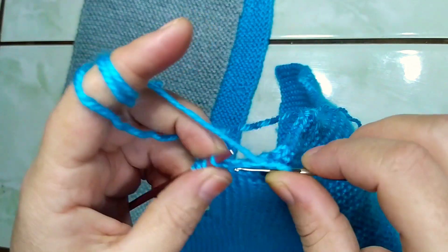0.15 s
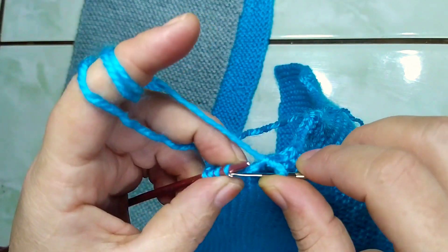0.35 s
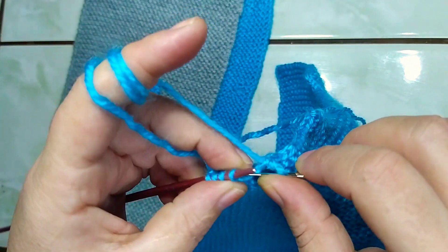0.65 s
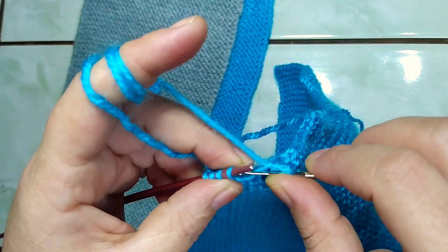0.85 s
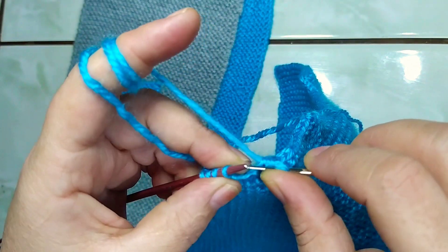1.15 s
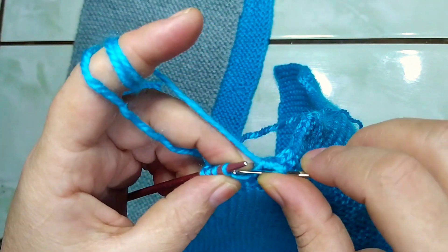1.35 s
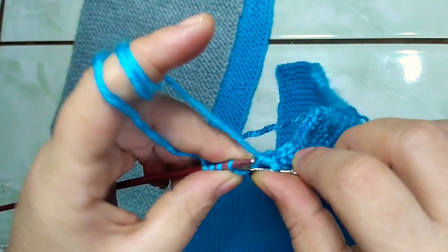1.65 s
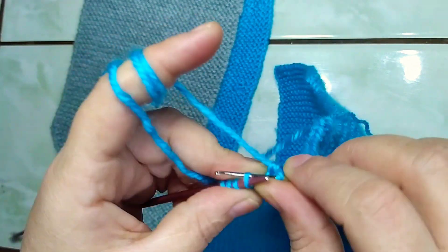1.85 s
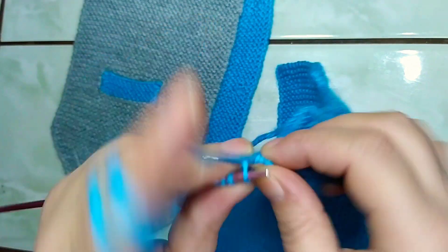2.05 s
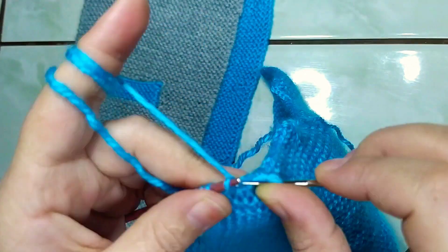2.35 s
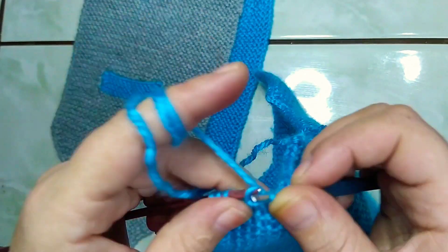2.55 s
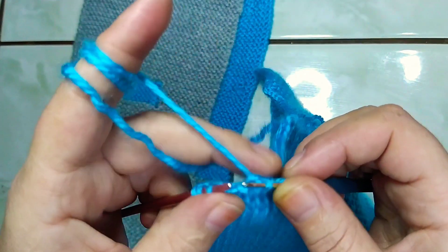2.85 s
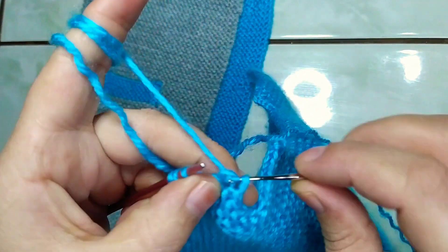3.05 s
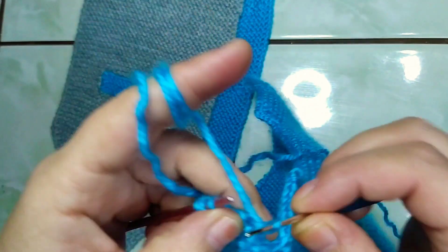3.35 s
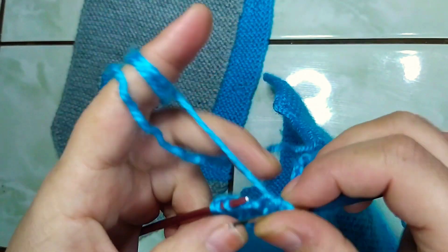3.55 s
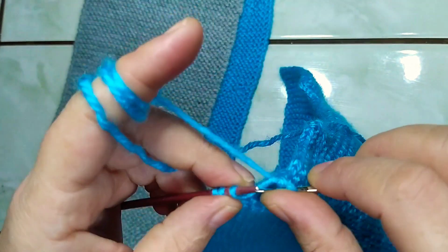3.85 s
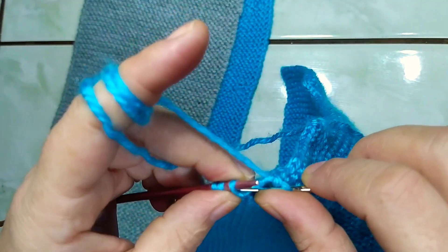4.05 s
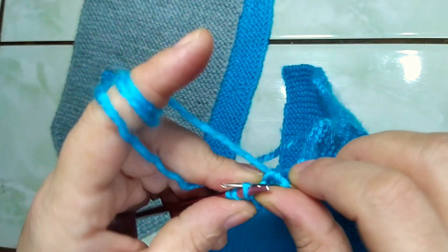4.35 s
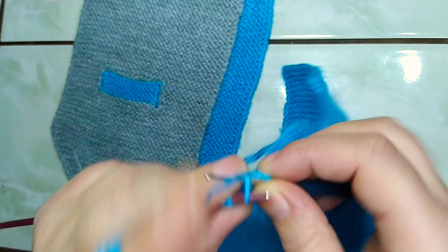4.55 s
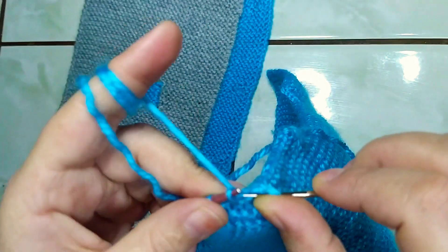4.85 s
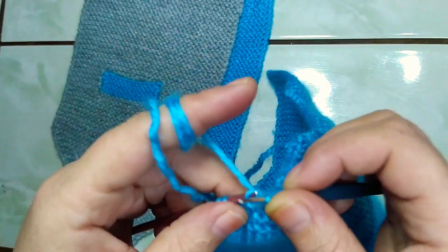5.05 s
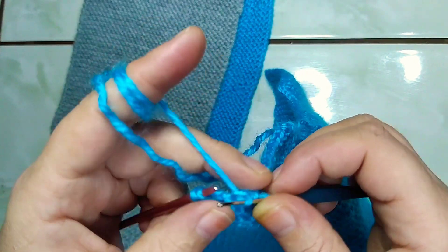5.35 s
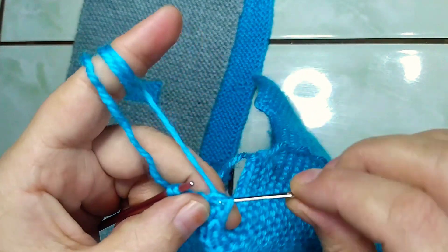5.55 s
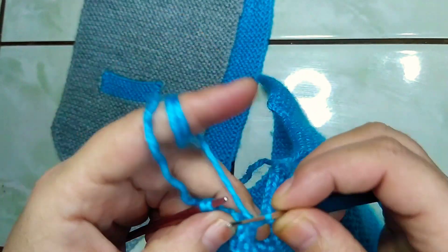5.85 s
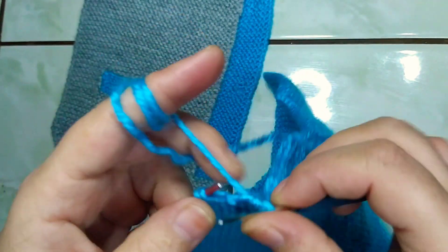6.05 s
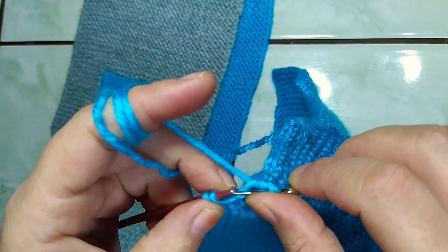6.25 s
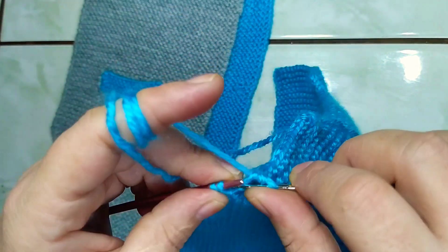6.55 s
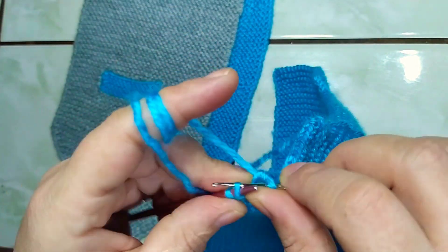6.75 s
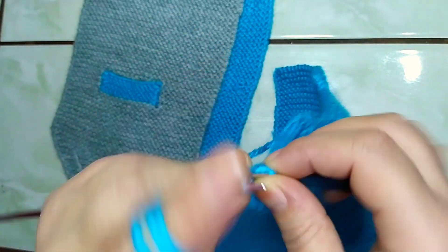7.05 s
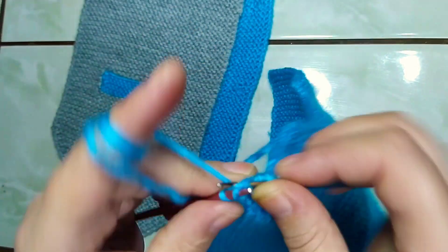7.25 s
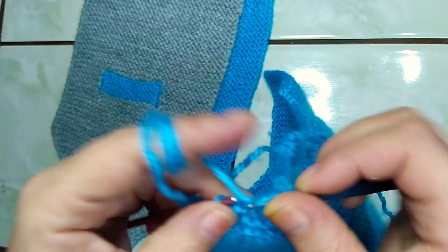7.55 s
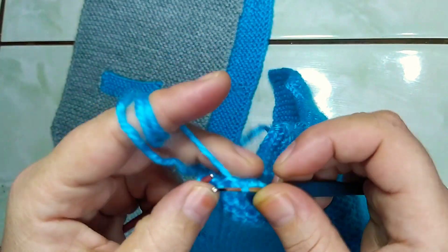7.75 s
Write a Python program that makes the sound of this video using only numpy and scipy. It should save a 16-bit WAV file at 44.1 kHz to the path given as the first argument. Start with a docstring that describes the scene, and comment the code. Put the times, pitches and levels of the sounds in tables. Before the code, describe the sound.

Close, quiet needlework: wispy wool hiss, tiny irregular metallic ticks, a single loud sharp crack near two seconds, then smaller snaps ringing off tiles.

```python
"""Two metal needles work yarn in a small tiled room, over a faint steady hum of air made of shaped noise.
It opens on the tail of a snap, while wool rustles on the shafts as many tiny grains in a soft hiss.
From then on the needle tips tick: short noise scrapes rung through the resonances of the needles.
The hardest snap comes at 1.75 s with one low push of air; lesser ones follow to 7.35 s.
A snap is a skid, a crack and the ringing room: the harder, the brighter and leaner."""
import sys
import numpy as np
from scipy import signal
from scipy.fft import rfft, irfft
from scipy.io import wavfile
from scipy.ndimage import uniform_filter1d

SR = 44100
rng = np.random.default_rng(int(sys.argv[2]) if len(sys.argv) > 2 else 0)


def to_wav(s):
    """Save 16-bit WAV."""
    ch = np.atleast_2d(s).T  # columns
    pcm = np.round(np.clip(ch, -1, 1) * 32767)  # PCM
    wavfile.write(sys.argv[1], SR, pcm.astype(np.int16))


N = 348390


def amp(db):
    """Decibels to gain."""
    return 10 ** (np.asarray(db) / 20)


def evened(x):
    """Scales to rms 1."""
    return x / np.sqrt(np.mean(x ** 2) + 1e-20)


def read(points, hz):
    """Reads a table on a log-frequency axis."""
    f, value = np.transpose(points)
    return np.interp(np.log(hz + 1), np.log(f + 1), value)


def lifts(modes, hz):
    """The dB that a set of resonances adds at each frequency."""
    return sum(db / (1 + (2 * (hz - f) / width) ** 2) for f, width, db in modes)


def bins(size):
    """Frequencies of the spectrum of so many samples."""
    return np.fft.rfftfreq(size, 1 / SR)


def ringing(db):
    """Causal (minimum-phase) impulse response of energy 1 with the given dB spectrum."""
    both_halves_db = np.concatenate([db, db[-2:0:-1]])
    log_gain = np.log(amp(both_halves_db))
    spectrum = np.exp(np.conj(signal.hilbert(log_gain)))
    response = np.fft.ifft(spectrum).real[:len(db)]
    return response[None] / np.linalg.norm(response)


def add(mix, s, sound):
    """Mixes a stereo sound in at time s, cutting what falls outside the mix."""
    start = round(s * SR)
    sound = sound[:, max(-start, 0):]
    part = mix[:, max(start, 0):][:, :sound.shape[1]]
    part += sound[:, :part.shape[1]]


def paired(x, likeness):
    """Gives two unrelated channels the listed left-right correlation at each frequency."""
    left, other = rfft(x)
    same = np.clip(read(likeness, bins(x.shape[1])), -1, 1)
    right = same * left + np.sqrt(1 - same ** 2) * other
    return irfft(np.array([left, right]), x.shape[1])


# spectrum of the room air, before it is set to its level: (f/Hz, relative level/dB)
AIR_COLOUR = [(5, 3), (14, -1.5), (22, -6), (36, -11), (100, -20.5), (200, -20), (400, -25), (680, -27.5),
              (1040, -33), (3000, -40), (6000, -45), (10600, -43.5), (13000, -51), (16000, -54.5)]
# its humming resonances: (f/Hz, width/Hz, lift/dB)
AIR_HUMS = [(195, 26, 4.3), (661, 35, 8.6), (740, 50, 5.1)]
# its stereo width: (f/Hz, left-right correlation)
AIR_WIDTH = [(60, 0.14), (150, -0.041), (380, 0.17), (950, -0.12), (2380, 0.21), (5980, -0.054),
             (15000, 0.21)]


def air(level_db=-64.5, balance_db=-0.2):
    """Steady room noise with a deep rumble and a few low humming resonances; level is rms above 20 Hz."""
    hz = bins(N)
    colour = read(AIR_COLOUR, hz) + lifts(AIR_HUMS, hz)
    noise = rfft(paired(rng.standard_normal((2, N)), AIR_WIDTH)) * amp(colour)
    audible_rms = np.std(irfft(noise * (hz > 20), N))
    sides = amp([[balance_db / 2], [-balance_db / 2]])
    return amp(level_db) * irfft(noise, N) / audible_rms * sides


# how long each band takes to die by 60 dB in the room: (f/Hz, decay t/s)
ROOM_DECAY = [(150, 0.53), (700, 0.31), (2000, .33), (5000, 0.28), (10000, 0.24), (15000, 0.28)]
# stereo width of the reflections: (f/Hz, left-right correlation)
ROOM_WIDTH = [(100, .9), (600, 0.86), (1300, 0.068), (3000, 0.046), (15000, 0.046)]


def room(build_s, first_gap_s=.0003, size=22050):
    """Reflections off tiles and walls grow denser; each band dies at its own speed; energy 1 a channel."""
    t = np.arange(size) / SR
    density = np.minimum((1 + t / 0.023) / (first_gap_s * SR), 1)  # chance of a reflection per sample
    present = rng.random((2, size)) < density
    taps = rng.choice([-1., 1.], (2, size)) * present / np.sqrt(density)
    hz, frame_s, z = signal.stft(paired(taps, ROOM_WIDTH), SR, nperseg=256)
    decay = amp(-60 * frame_s / read(ROOM_DECAY, hz)[:, None])
    tail = signal.istft(z * decay, SR, nperseg=256)[1][:, :size]
    tail *= 1 - np.exp(-(t / build_s) ** 2)  # soft onset
    return evened(tail) / np.sqrt(size)


def contact(length_ms, size=22050):
    """A brief scrape: a cluster of tiny slips that swells and dies; energy 1 a channel."""
    u = np.arange(size) / SR * 1000 / max(length_ms, .2)  # time in scrape lengths
    swell = np.sqrt(u) * np.exp(-np.minimum(u, 50))
    slips = rng.standard_normal((2, size)) * swell
    return slips / np.linalg.norm(slips, axis=1, keepdims=True)


def wander(count):
    """Slow random drift of rms 1, noise smoothed twice over so many samples."""
    once = uniform_filter1d(rng.standard_normal(N), count, mode="wrap")
    return evened(uniform_filter1d(once, count, mode="wrap"))


# how hard the wool slides on the shafts: (t/s, level/dB before the rustle's gain)
WOOL_SLIDING = [(0.0, -72), (0.18, -78), (0.3, -89), (0.46, -77.5), (1.32, -93), (1.58, -84), (1.64, -71),
                (2.04, -63.8), (2.18, -76.5), (2.57, -74), (3.13, -80), (3.23, -70.5), (3.81, -78.5),
                (3.91, -84.5), (4.47, -71), (5.51, -76.5), (5.73, -69.5), (6.43, -86), (6.59, -79.5),
                (7.34, -70), (7.88, -78.5)]


def sliding_db(s):
    """Level of the sliding wool at time s, drawn as straight dB ramps."""
    return np.interp(s, *np.transpose(WOOL_SLIDING))


# spectrum of the wool: (f/Hz, relative level/dB per Hz)
WOOL_COLOUR = [(800, -17), (3000, -9), (7000, -11), (9500, -1.5), (11000, 1.5), (12200, -10), (16000, -15)]


def rustle(gain_db=3.0, catches_per_s=700, spread_db=6.5, smooth=0.45, room_db=-2, grip_db=2.5):
    """Wool fibres catch and let go on the shafts: uneven tiny grains in a soft hiss, under a varying grip."""
    caught = rng.random(N) < catches_per_s / SR
    catches = caught * amp(spread_db * np.minimum(rng.exponential(1, N), 4))
    grains = signal.fftconvolve(catches[None], contact(0.48), axes=1)[:, :N]
    fibres = grains + smooth * rng.standard_normal((2, N))
    fibres *= amp(grip_db * wander(count=600))
    fibres += amp(room_db) * signal.fftconvolve(fibres, room(build_s=.007), axes=1)[:, :N]
    colour = read(WOOL_COLOUR, bins(4096))
    wool = signal.fftconvolve(fibres, ringing(colour), axes=1)[:, :N]
    return evened(wool) * amp(gain_db + sliding_db(np.arange(N) / SR))


def slide(length_ms, size=530):
    """The tip skids harder and harder, then lets go: a scrape played backwards; energy 1 a channel."""
    return contact(length_ms, size=size)[:, ::-1]


def ripple(hz):
    """Random uneven colouring: neighbouring frequencies are lifted or cut by chance; rms 1 on a 55 Hz grid."""
    grid = np.arange(0, 24000, 55)
    return np.interp(hz, grid, rng.standard_normal(len(grid)))


# a harder snap than usual is brighter and has less thump, by so many dB per dB of force
USUAL_SNAP_DB = -45  # on the level scale of the snap table
SNAP_TREBLE_DB, TREBLE_DB_PER_DB = -12.5, 0.99
SNAP_THUMP_DB, THUMP_DB_PER_DB = 6, -0.8
TIP_HZ, TIP_WIDTH_HZ = 9860, 610  # ring of the steel tip
# sharp snaps: (t/s, level/dB before the snaps' gain, lift of the tip ring/dB)
SNAP_EVENTS = [(-0.022, -36.5, 12), (1.7526, -23, -4), (3.256, -58, 9), (3.4396, -41, 11),
               (5.2647, -46, 10.5), (5.646, -55, 6), (5.832, -47.5, 11), (5.907, -59, 4.5),
               (5.962, -57.5, 6), (5.993, -61, 6), (7.35, -45, 4)]
# spectrum of a snap: (f/Hz, relative level/dB per Hz)
SNAP_SPECTRUM = [(40, -21.5), (110, -19.5), (180, -10), (330, -10.5), (560, -3), (800, -1), (1200, 1),
                 (2500, 0.5), (4000, -1.5), (7000, -4.5), (10500, -5.5), (12000, -13), (14000, -27.5),
                 (16000, -32)]
# resonances of a snap: (f/Hz, width/Hz, lift/dB)
SNAP_RESONANCES = [(166, 75, 7), (291, 60, 11), (402, 47, 5.2), (718, 23, 3.7), (1008, 180, 4),
                   (1215, 70, 3), (1910, 120, 4), (2212, 10, 4.8), (2660, 280, 6.9), (2954, 25, 6),
                   (3372, 19.3, 4.5), (4430, 35, 3.7), (5330, 50, 5.7), (6630, 45, 7), (10460, 320, 3)]


def snaps(gain_db=34, crack_ms=0.58, crack_db=-9, skid_db=-23, skid_ms=0.74, treble_hz=3900,
          thump_hz=120, own_share=.45, ripple_db=4.0, ripple_from_hz=1000):
    """A skid, a short crack, then the room; snaps come from nearly one spot and share many reflections."""
    out, hz, shared = np.zeros((2, N)), bins(8192), room(build_s=0.002)
    own = np.clip(own_share, 0, 1)
    body = read(SNAP_SPECTRUM, hz) + lifts(SNAP_RESONANCES, hz)
    body += ripple_db * ripple(hz) * hz / (hz + ripple_from_hz)
    for s, db, tip_db in SNAP_EVENTS:
        force_db = db - USUAL_SNAP_DB
        treble_db = SNAP_TREBLE_DB + TREBLE_DB_PER_DB * force_db
        thump_db = SNAP_THUMP_DB + THUMP_DB_PER_DB * force_db
        colour = body + lifts([(TIP_HZ, TIP_WIDTH_HZ, tip_db)], hz)
        colour += treble_db * hz ** 4 / (hz ** 4 + treble_hz ** 4)
        colour += thump_db / (1 + (hz / thump_hz) ** 2)
        tail = np.sqrt(1 - own) * shared + np.sqrt(own) * room(build_s=0.0051)
        skid = amp(skid_db) * slide(skid_ms)
        crack = amp(crack_db) * contact(crack_ms)
        blow = np.hstack([skid, crack + tail])
        snap = amp(db + gain_db) * signal.fftconvolve(blow, ringing(colour), axes=1)
        add(out, s - skid.shape[1] / SR, snap)  # the crack, not the skid, falls on s
    return out


def grazes(count=40, over_wool_db=19.0, spread_db=3.5, pan_db=-3.0, pan_spread_db=4):
    """Faint chance touches of the tips, the stronger the more the wool moves; rows like TICK_EVENTS."""
    s = rng.uniform(0, N / SR, count)
    strength, side = rng.standard_normal((count, 2)).T
    db = sliding_db(s) + over_wool_db + spread_db * strength
    return np.column_stack([s, db, pan_db + pan_spread_db * side, np.full(count, USUAL_LOW_DB)])


CONTACT_MS, CONTACT_SCATTER = 1.1, .12  # scrape length of the tips, and its random spread (log scale)
LOW_RING_HZ, USUAL_LOW_DB = 6960, -20  # the low ring lies below this pitch; this strength leaves it as is
# clear ticks of the needle tips: (t/s, level/dB before the ticks' gain, left over right/dB,
# low ring/dB, heard as its difference from the usual)
TICK_EVENTS = [(0.191, -52.5, -1.0, -20), (0.385, -52, -2.0, -20), (0.448, -45.5, 0, -16),
               (0.5681, -49, -3, -21), (0.6943, -58, 2.5, -18), (0.9722, -57, 0.0, -20),
               (1.2335, -45.5, 1.0, -26), (1.6266, -44.5, 0, -29), (1.6761, -50, -6, -20),
               (1.7515, -4.5, -0.5, -13.5), (1.988, -41.5, -12, -16), (2.0972, -41.5, -5.5, -20),
               (2.2398, -43.5, -4.5, -22.5), (2.2466, -43.5, -2.5, -22.5), (2.331, -42, -6, -29.5),
               (3.256, -46, -6, -17), (3.4384, -21.5, -4.5, -23.5), (3.4417, -17, -2.5, -23),
               (3.6265, -47, 2, -23.5), (3.7588, -51, -1, -16), (4.1118, -45, -2.5, -16.5),
               (4.2118, -46, 0.5, -15.5), (4.2378, -38, -3.5, -17), (4.2467, -38.5, 2.0, -18.5),
               (4.3158, -36, 2, -14), (4.4942, -45, -3.5, -18.5), (4.589, -47.5, -5.5, -12.5),
               (4.7747, -46.5, -3.5, -23.5), (5.0913, -52, -0.5, -24), (5.2653, -27.5, -3, -16),
               (5.5927, -52, 2, -20), (5.7828, -46, -9, -26), (5.8364, -29.5, -5.0, -19),
               (5.9057, -36, -6, -20), (6.0182, -43, -10, -24), (6.1764, -49.5, -0.5, -23.5),
               (6.6608, -32.5, -2, -17.5), (6.6734, -36.5, -0.5, -17.5), (6.6768, -32, -3, -20),
               (6.705, -32, -2.5, -22.5), (6.7691, -40, -5, -16), (6.821, -48, -7, -16),
               (7.0017, -48.5, -9.5, -15), (7.0836, -44, -3.5, -19.5), (7.113, -49, -3.5, -13.5),
               (7.2978, -44, -6, -23.5), (7.3529, -28.5, -6.5, -19), (7.4684, -39, -7, -22)]
# spectrum of a tick: (f/Hz, relative level/dB per Hz)
TICK_SPECTRUM = [(300, -32), (1500, -25), (3000, -17), (5000, -15.5), (7200, -10.5), (9000, -7),
                 (11300, -3.5), (12500, -13), (14000, -19), (16000, -19.5)]
# resonances of the needles: (f/Hz, width/Hz, lift/dB)
NEEDLE_RESONANCES = [(5380, 460, 4.5), (6500, 120, 7.5), (7970, 560, 4.5), (9780, 690, 8.5),
                     (10640, 500, 7.5)]


def ticks(gain_db=14, room_db=-8, skid_db=-10, skid_ms=0.91, strike_after_s=.0007, ripple_db=1.0):
    """Metal tips skid and strike; the needles ring briefly and the room answers faintly."""
    out, hz = np.zeros((2, N)), bins(1024)
    body = read(TICK_SPECTRUM, hz) + lifts(NEEDLE_RESONANCES, hz)
    for s, db, pan_db, low_db in [*TICK_EVENTS, *grazes()]:
        low_lift = (low_db - USUAL_LOW_DB) / (1 + (hz / LOW_RING_HZ) ** 10)
        colour = body + ripple_db * ripple(hz) + low_lift
        sides = np.sqrt(2) * amp([[pan_db], [0]]) / np.hypot(amp(pan_db), 1)  # equal-power pan
        length_ms = CONTACT_MS * np.exp(CONTACT_SCATTER * rng.standard_normal())
        skid = amp(skid_db) * slide(skid_ms)
        touch = np.hstack([skid, contact(length_ms, size=1024)]) * sides
        tick = amp(db + gain_db) * signal.fftconvolve(touch, ringing(colour), axes=1)
        add(out, s + strike_after_s - skid.shape[1] / SR, tick)
    heard_by_room = out.sum(axis=0, keepdims=True) / np.sqrt(2)
    answer = signal.fftconvolve(heard_by_room, room(build_s=0.005), axes=1)[:, :N]
    return out + amp(room_db) * answer


# the push of air as the hardest snap jolts the hands: (t/s, approximate peak level/dB, time constant t/s)
AIR_PUSH = (1.756, -36.5, 0.0011)


def jolt(room_db=-5):
    """One low push of air that swings back, and its short boom in the room."""
    s, db, length_s = AIR_PUSH
    u = np.arange(8192) / SR / length_s  # time in push lengths
    push = 2 * amp(db) * u * (2 - u) * np.exp(-u)
    boom = signal.fftconvolve(push[None], room(build_s=0.0079), axes=1)
    out = np.zeros((2, N))
    add(out, s, np.array([push, push]))
    add(out, s, amp(room_db) * boom)
    return out


def scene():
    """Needles and wool in the quiet room."""
    return air() + rustle() + snaps() + ticks() + jolt()


def record(dry, ceiling=.85, edge_hz=16200):
    """The microphone rounds off the hardest peaks; then a low-pass sets the band limit."""
    rounded = ceiling * np.tanh(dry / ceiling)
    low_pass = signal.firwin(511, edge_hz, window=("kaiser", 9), fs=SR)
    return signal.oaconvolve(rounded, low_pass[None], "same")


dry = scene()
out = record(dry)
to_wav(out)
```